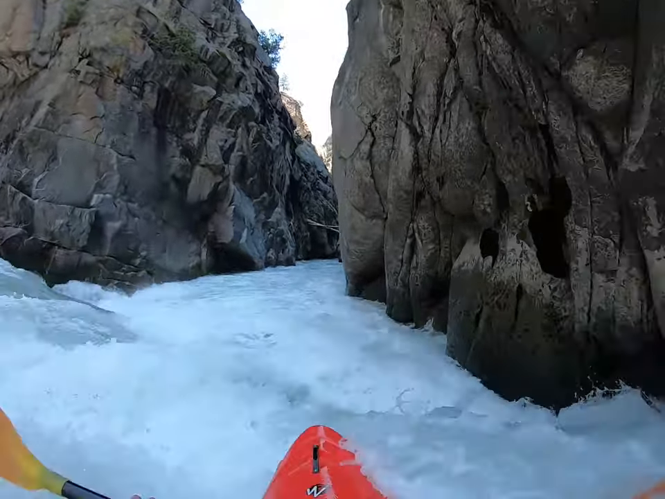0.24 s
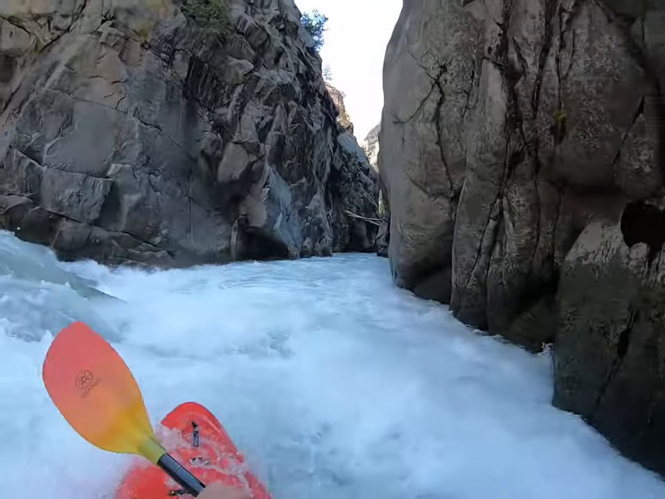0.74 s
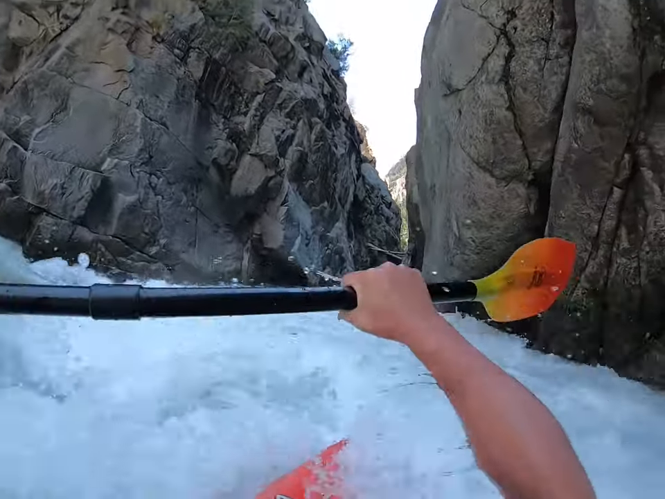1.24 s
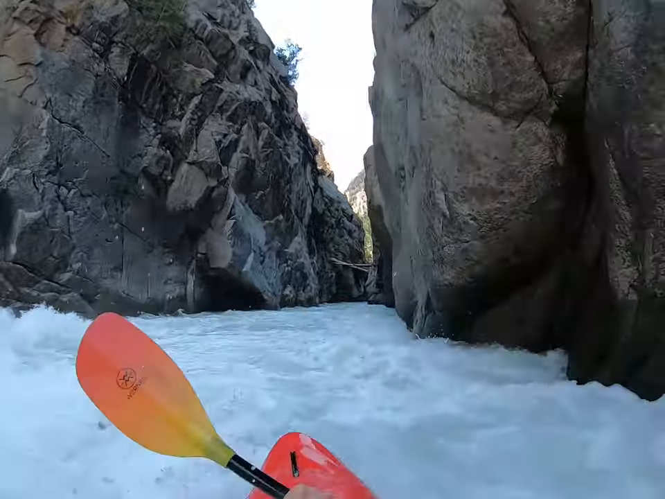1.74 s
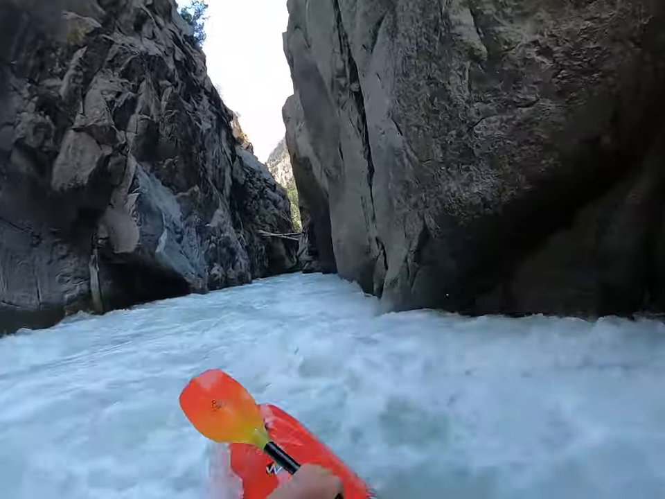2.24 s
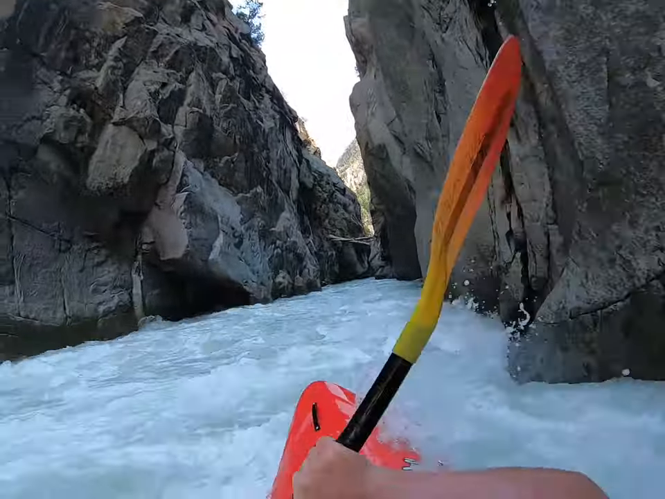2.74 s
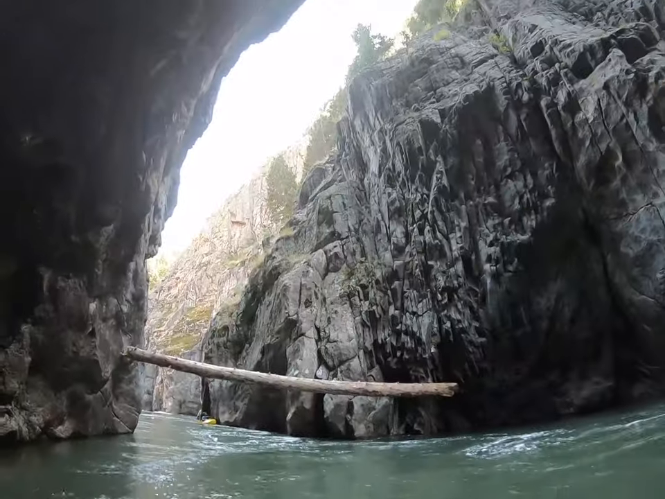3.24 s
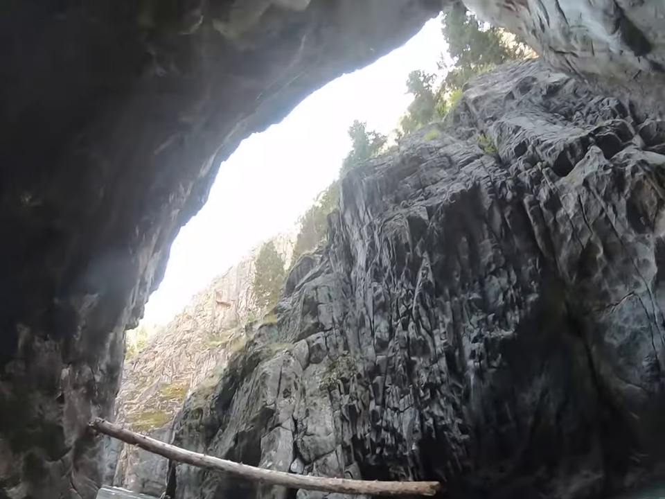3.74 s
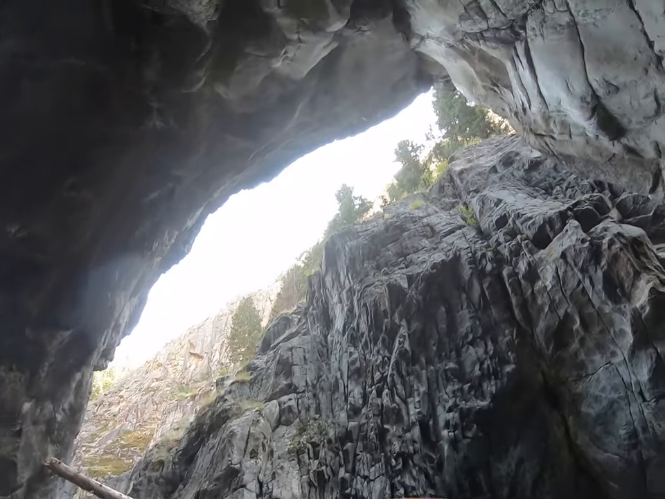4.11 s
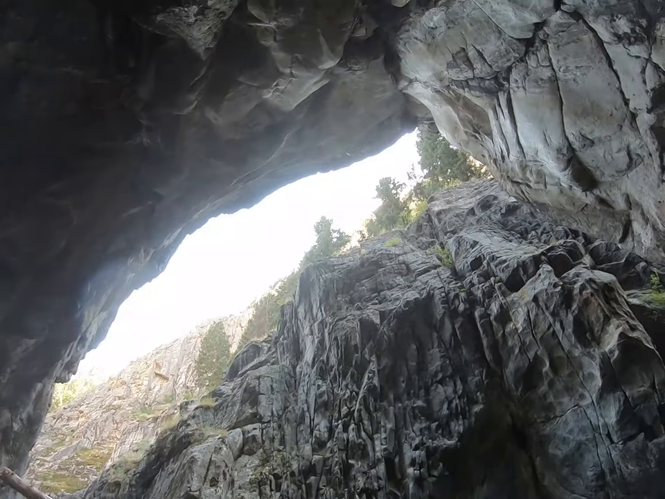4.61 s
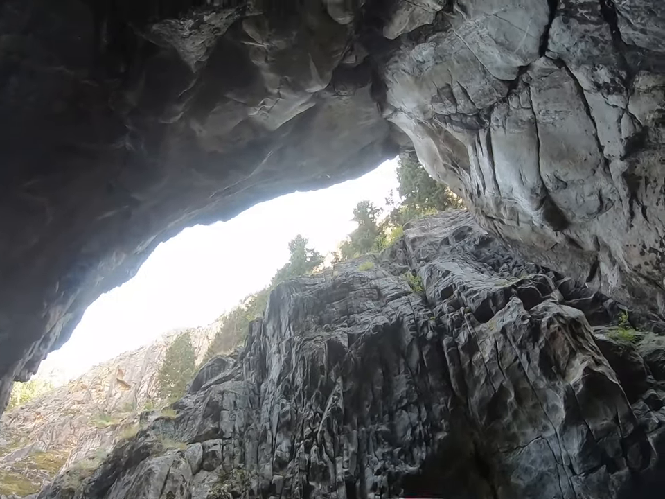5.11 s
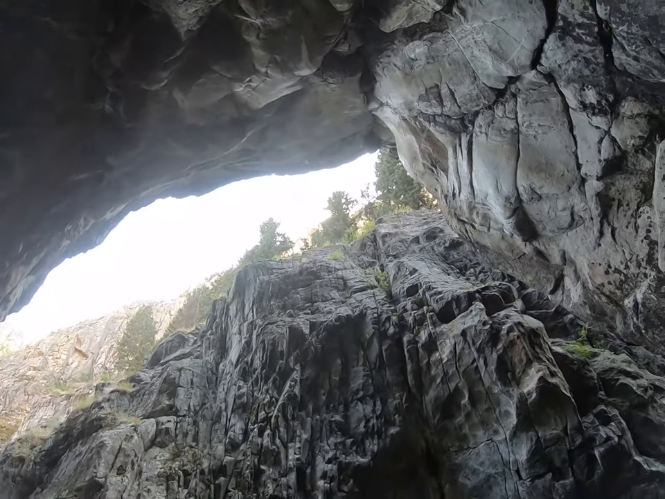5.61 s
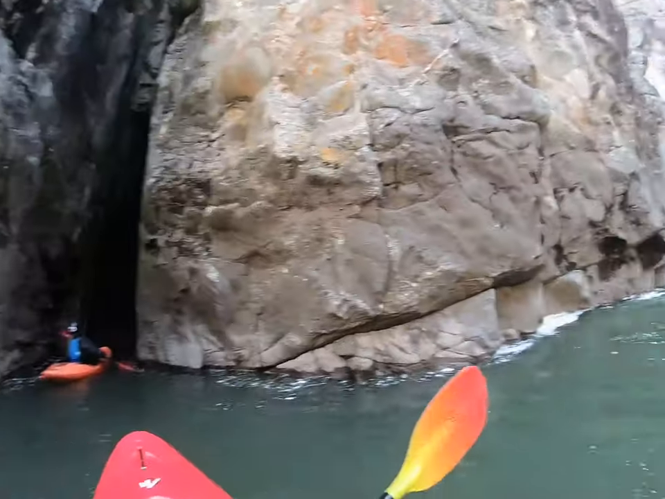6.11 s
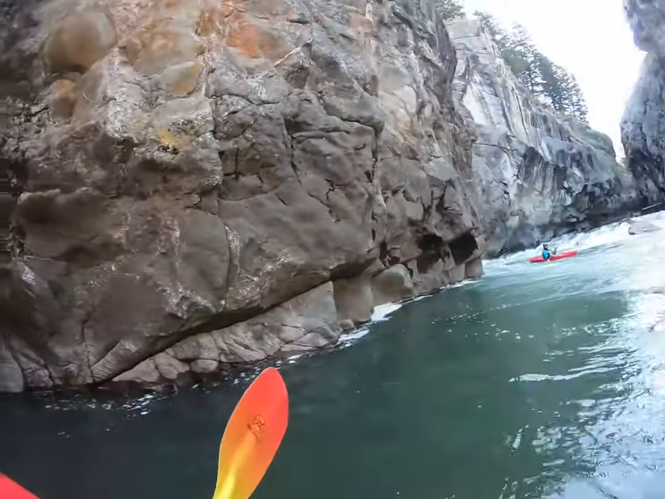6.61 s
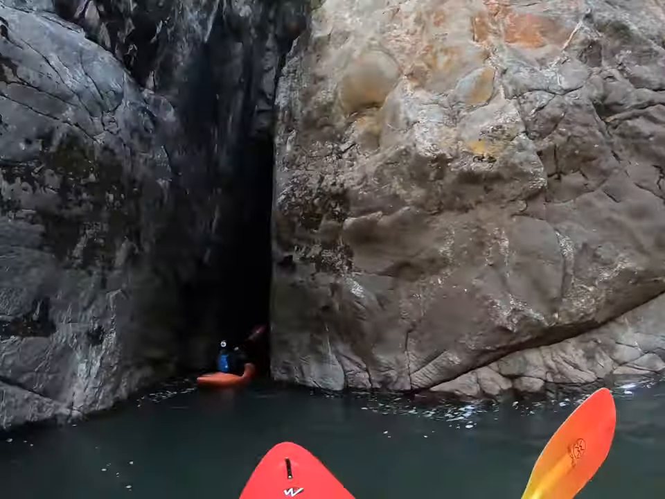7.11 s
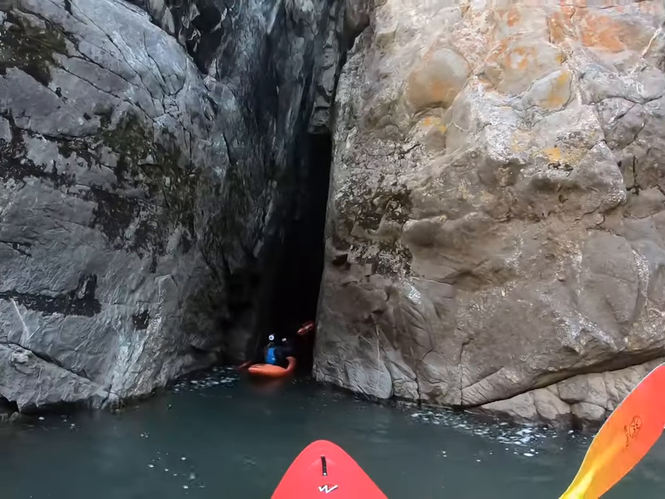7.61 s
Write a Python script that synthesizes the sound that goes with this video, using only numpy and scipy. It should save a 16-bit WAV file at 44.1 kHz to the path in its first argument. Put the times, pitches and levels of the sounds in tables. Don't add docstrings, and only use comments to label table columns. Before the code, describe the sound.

Powerful rapids pound around the boat, boomy and uneven, dipping briefly before swelling again. Suddenly the scene becomes a calm rocky eddy: soft low water murmur, slow laps, a few tiny ticks on the camera housing, the last with a short watery plink. Then a smooth, open rush of rapids fills a pool, quiet compared with the start, softening and returning as the head turns.

```python
import sys
import numpy as np
from scipy import signal
from scipy.fft import rfft, irfft, next_fast_len
from scipy.io import wavfile

SR = 44100
rng = np.random.default_rng(int(sys.argv[2]) if len(sys.argv) > 2 else 0)


def generate_wav(signal):
    frames = np.transpose(np.atleast_2d(signal))
    scaled = np.clip(frames, -1, 1) * 32767
    pcm = np.round(scaled).astype(np.int16)
    wavfile.write(sys.argv[1], SR, pcm)


def makeup_ratio(level_db):
    decades = np.asarray(level_db, float) / 20
    return 10 ** decades


N = 346343

CUTS_S = 2.8792, 5.7818
RAPID_HZ, SPRAY_HZ = (20, 130, 330, 1300, 10700), (10500, 15750)
EDDY_HZ, POOL_HZ = (20, 130, 1300, 4800, 15000), (20, 130, 1300, 6500, 15500)
# frequency in Hz, level in dB per Hz.
RAPID_COLOUR = [(20, -7), (60, 0.5), (250, 3), (540, -4.5), (660, -8), (1200, -17.5), (1430, -22.5),
                (1700, -22.5), (2180, -36), (2630, -34.5), (3600, -52), (6300, -57.5), (7000, -64),
                (10500, -71.5)]
EDDY_COLOUR = [(20, -3), (40, -4), (110, -9.5), (150, -2.5), (230, -4), (400, -9), (900, -15), (1500, -19),
               (3000, -26.5), (4500, -36.5), (6000, -44), (8000, -59.5), (11500, -64), (13000, -74)]
POOL_COLOUR = [(25, -22), (65, -4.5), (110, -7), (150, -2), (210, 0), (400, -5), (1000, -9.5), (2000, -18),
               (3500, -25.5), (6000, -36.5), (7500, -49.5), (9500, -51.5), (12000, -52), (14000, -64)]
SPRAY_COLOUR = [(10500, -45.5), (11000, -25), (11500, -8.5), (12200, -0.5), (13000, -7), (14000, -9),
                (15500, -17)]
# frequency in Hz, likeness from 0 to 1, left lead in radians,
# left minus right in dB.
EDDY_PORTS = [(30, .2, -.5, -5), (95, .5, 0, -1.5), (125, .95, 0, -.5), (350, .95, 0, -.5),
              (700, .6, -.1, -2), (1000, .26, .6, -2.3), (1400, .23, .4, -.6), (2000, .38, -.3, .5),
              (3500, .64, .1, 0), (5500, .3, .3, -.4), (7500, .16, 2.1, 0), (10000, .16, 3.4, -2.6)]
POOL_PORTS = [(30, .6, 2.1, -8), (95, .55, 0, -2.5), (130, .97, -.1, 0), (230, .98, -.1, 0),
              (400, .87, -.3, -1.6), (700, .48, -.4, -4.9), (1000, .32, 1.3, -5.4), (1400, .35, 1.3, -2.6),
              (2000, .34, .6, -1.7), (3500, .48, .2, -2.9), (5500, .32, -2, -4.2), (7500, .36, -2.9, -1.2),
              (10000, .38, -3.6, -6.5)]
ONE_PORT = [(20, 1, 0, 0), (20000, 1, 0, 0)]
# start in seconds, peak in dB, left minus right in dB.
DROPS = [
    (4.5544, -74, 1.0),
    (4.9711, -59, 0.0),
    (5.3844, -76, -0.5),
    (5.6396, -51, -3.0),
]
# T60 in seconds, low edge in Hz, high edge in Hz.
DROP_TIMBRES = [
    (.03, 9500, 12000),
    (.04, 3500, 13500),
    (.03, 10000, 12000),
    (.07, 2200, 6000),
]
# time in seconds, dB from its usual force.
RAPID_FORCE = [(0.03, 0.35), (1.1, 0.4), (1.5, 1.5), (1.64, 0), (1.74, -7), (2.05, -5), (2.25, -2),
               (2.58, -1.5), (2.87, -3.5)]
EDDY_FORCE = [(2.9, 4.5), (3.4, 4), (3.8, 1), (4.1, 0.1), (5.0, 0.3), (5.77, -0.3)]
POOL_FORCE = [(5.8, 1.2), (6.1, 0.8), (6.3, -1), (6.95, -1.1), (7.25, 0.28), (7.85, 0.68)]
# time in seconds, level in dB.
SPRAY_FORCE = [(0.03, -61.5), (0.46, -63.5), (1.33, -59.5), (1.54, -59.5), (1.69, -64), (1.79, -76.5),
               (2.28, -64), (2.51, -63), (2.87, -67)]
# level in dB at usual force, share of the force's swing.
RAPID_LAYERS = [
    (-28.5, 0.74),
    (-24, 1.05),
    (-23.5, 0.86),
    (-41, 0.067),
]
EDDY_LAYERS = [
    (-49.5, 0.88),
    (-44, 0.78),
    (-56.5, 0.85),
    (-74.5, 0.18),
]
POOL_LAYERS = [
    (-56.5, 0.21),
    (-40.5, 0.086),
    (-50, 0.076),
    (-70.5, 1.4),
]
SPRAY_LAYERS = [(0, 1)]
# time in seconds, lift in dB,
# length in seconds, pitch in Hz.
RAPID_WAVES = [(0.053, 9.5, 0.03, 190), (0.23, 6, 0.24, 110), (0.45, 6.5, 0.082, 149), (0.6, 6, .04, 202),
               (0.792, 8.5, 0.089, 182), (0.87, -14, .05, 54.6), (0.9, 2.5, 0.2, 2500),
               (1.055, 7, 0.074, 250), (1.181, 13, 0.015, 192), (1.22, -18, 0.031, 195),
               (1.26, -3.5, 0.033, 1500), (1.328, 2.5, 0.037, 510), (1.417, 6, .025, 55),
               (1.486, 8.5, 0.025, 260), (1.5, 4.5, 0.046, 3000), (1.511, 3, 0.12, 520),
               (1.602, 7, 0.078, 50), (1.63, 8.5, 0.067, 130), (1.743, -10, .04, 35), (1.95, 5, 0.36, 1000),
               (2.103, 9.5, 0.025, 300), (2.2, -6.5, 0.18, 140), (2.227, 8, 0.028, 282),
               (2.362, 4.5, 0.025, 270), (2.4, -21, 0.065, 40), (2.557, 8, 0.043, 205),
               (2.606, 13, 0.026, 59.3), (2.707, 2, .02, 100), (2.78, -8, 0.095, 302), (2.86, -3, .02, 60)]
EDDY_WAVES = [(2.95, 3, .05, 220), (3.2, 1.5, 0.26, 4000), (3.05, -13, .05, 45), (3.16, 10, 0.035, 85),
              (3.25, 9, 0.094, 89), (3.65, 4.5, 0.068, 170), (3.68, 13, .08, 32), (3.8, 17, 0.11, 71.6),
              (3.92, 8, 0.048, 30), (4.0, 8, 0.045, 129), (4.12, -7, .08, 60), (4.32, 10, .09, 32),
              (4.6, 10, .03, 40), (4.78, -11, .05, 110), (5.0, 5, .04, 30), (5.15, 3, .05, 70),
              (5.33, 4, .04, 140), (5.45, 4, .05, 40), (5.65, -17, 0.099, 50)]
POOL_WAVES = [(5.82, 5, .04, 90), (5.95, -8, .08, 45), (6.1, 13, 0.034, 130), (6.27, 22, 0.061, 60),
              (6.27, 6, 0.04, 170), (6.36, 15, 0.027, 75), (6.5, 16, 0.045, 40), (6.53, 7, 0.082, 130),
              (6.75, 7, 0.029, 211), (6.88, -6, .1, 45), (6.95, 2.5, 0.092, 200), (7.08, 8, 0.088, 70),
              (7.3, -5, .07, 40), (7.45, 14, 0.044, 90), (7.45, 5.5, 0.036, 151), (7.6, -11, .06, 50),
              (7.84, 4, .03, 150)]

WAVE_OCTAVES = 0.51
LUMPY_HZ = 45
HEAVE_TOP_HZ = 2500
TOP_HZ = 15750
PORT_CUT_HZ, WIND_TOP_HZ = 5.3, 110
OPENS_S, WATER_OPENING_S, WIND_OPENING_S = 3.43, 1, .35
WATER_WIDTH_DB, WIND_WIDTH_DB = 1.9, -1.5
GATE_EASES_S = 3.88
PLINK_S, PLINK_DB, PLINK_HZ, PLINK_T60_S = 5.6415, -46, 2700, .015
DROP_TOP_HZ = 13800
EDDY_FADE_S, POOL_FADE_S = .0015, .004
FIRST_SWING, LAST_SWING = -.28, .03


def in_time(rows, start, size):
    s, *columns = np.transpose(rows)
    t = (start + np.arange(size)) / SR
    return np.array([np.interp(t, s, c) for c in columns])


def at_hz(rows, hz):
    table_hz, *columns = np.transpose(rows)
    return [np.interp(np.log(hz + 1), np.log(table_hz), c) for c in columns]


def drift(rate, size):
    r = np.exp(-128 * np.pi * rate / SR)
    noise = rng.standard_normal(size // 64 + 1002)
    slow = signal.lfilter([1], [1, -2 * r, r * r], noise)[1000:]
    return np.interp(np.arange(size) / 64, np.arange(len(slow)), slow / slow.std())


def drops():
    out, t = np.zeros((2, N)), np.arange(SR // 20) / SR
    for (s, db, pan_db), (t60, low_hz, high_hz) in zip(DROPS, DROP_TIMBRES):
        bright = signal.butter(2, [low_hz, high_hz], "band", fs=SR, output="sos")
        swell = (1 - np.exp(-t / 0.00074)) * makeup_ratio(-60 * t / max(t60, 1e-3))
        tick = signal.sosfilt(bright, rng.standard_normal((2, len(t))) * swell)
        at = round(s * SR)
        out[:, at:at + len(t)] += tick * makeup_ratio(db + np.array([[pan_db], [-pan_db]]) / 2)
    return out


def plink():
    out, t = np.zeros(N), np.arange(SR // 20) / SR
    at = round(PLINK_S * SR)
    swell = makeup_ratio(PLINK_DB - 60 * t / PLINK_T60_S) * (1 - np.exp(-t / 0.00053))
    out[at:at + len(t)] = swell * np.sin(2 * np.pi * PLINK_HZ * t)
    return out


def collapses(per_s, spread_db, size):
    born = rng.random((2, size)) < per_s / SR
    loudness = makeup_ratio(spread_db * rng.exponential(1, (2, size)))
    clicks = born * loudness * rng.choice([-1, 1], (2, size))
    return clicks / clicks.std()


def waves_db(waves, centre_hz, t):
    lift = np.zeros(len(t))
    for s, db, length, hz in waves:
        octaves = np.log2(centre_hz / hz) / WAVE_OCTAVES
        lift += db * np.exp(-octaves ** 2 - ((t - s) / max(length, .005)) ** 2)
    return lift


def at_ports(bubbles, hz, top_hz, colour, ports):
    tone = makeup_ratio(at_hz(colour, hz)[0]) * (hz < top_hz)
    common, other = rfft(bubbles) * tone * hz ** 2 / (hz ** 2 + PORT_CUT_HZ ** 2)
    alike, lead, pan_db = at_hz(ports, hz)
    alike = np.clip(alike, 0, 1)
    left = common * makeup_ratio(pan_db / 2)
    right = alike * np.exp(-1j * lead) * common + np.sqrt(1 - alike ** 2) * other
    return left, right * makeup_ratio(-pan_db / 2)


def water(start, stop, force, layers, waves, edges, colour, ports, per_s, spread_db, heave_db, churn_db):
    size = next_fast_len(stop - start)
    hz = np.fft.rfftfreq(size, 1 / SR)
    left, right = at_ports(collapses(per_s, spread_db, size), hz, edges[-1], colour, ports)

    power = np.abs((left + right) / 2) ** 2 * 2 / size ** 2
    layer_rms = [np.sqrt(power[(hz >= a) & (hz < b)].sum()) for a, b in zip(edges, edges[1:])]
    level_db, follows = np.transpose(layers)[:, :, None]
    gains = makeup_ratio(level_db + follows * in_time(force, start, size)) / np.array(layer_rms)[:, None]

    t = (start + np.arange(size)) / SR
    coarse = t[::64]
    centres = edges[0] * 2 ** np.arange(0, np.log2(TOP_HZ / edges[0]) + .5, .5)
    out, heave = 0, drift(12.0, size)
    for k, centre in enumerate(centres):
        share = np.interp(np.log(hz + 1), np.log(centres), np.arange(len(centres)) == k)
        gain = gains[min(np.searchsorted(edges[1:], centre), len(gains) - 1)]
        motion_db = np.interp(t, coarse, waves_db(waves, centre, coarse))
        motion_db += heave_db * heave / (1 + centre / HEAVE_TOP_HZ)
        motion_db += churn_db * (1 + (LUMPY_HZ / centre) ** 2) * drift(11.6, size)
        out = out + irfft(share * np.array([left, right]), size) * gain * makeup_ratio(motion_db)
    return out[:, :stop - start]


def wind_guard(x, start):
    mid, side = (x[0] + x[1]) / 2, (x[0] - x[1]) / 2
    wind = signal.sosfiltfilt(signal.butter(2, WIND_TOP_HZ, fs=SR, output="sos"), side)
    since = np.maximum(np.arange(start, start + x.shape[1]) / SR - OPENS_S, 0)
    water_width = makeup_ratio(WATER_WIDTH_DB) * (1 - np.exp(-since / WATER_OPENING_S))
    wind_width = makeup_ratio(WIND_WIDTH_DB) * (1 - np.exp(-since / WIND_OPENING_S))
    side = water_width * (side - wind) + wind_width * wind
    return np.array([mid + side, mid - side])


def treble_gate(x, line_db, band_db, rise_db):
    hz, _, cells = signal.stft(x, SR, "cosine", 2048, 1024)
    size = np.abs(cells)
    bands = np.sqrt((size[:, :1024] ** 2).reshape(2, 64, 16, -1).mean(axis=2))
    climb = rise_db * np.clip(hz[8:1024:16] / 1000 - 11.9, 0, None)[:, None]
    heard = bands > makeup_ratio(band_db + climb + rng.normal(0, 1.5, bands.shape))
    cells[:, :1024] *= np.repeat(heard, 16, axis=1)
    cells = cells * (size > makeup_ratio(line_db))
    return signal.istft(cells, SR, "cosine", 2048, 1024)[1][:, :x.shape[1]]


def pinned(x, start, end):
    settle = np.exp(-(np.arange(x.shape[1]) / SR / .002) ** 2)
    return x + (start - x[:, :1]) * settle + (end - x[:, -1:]) * settle[::-1]


def fade_in(size, fade_s):
    return 1 - np.exp(-(np.arange(size) / SR / fade_s) ** 2)


def distant_pool(start, stop):
    pool = water(start, stop, POOL_FORCE, POOL_LAYERS, POOL_WAVES, POOL_HZ, POOL_COLOUR, POOL_PORTS,
                 per_s=25000, spread_db=1.88, heave_db=0.08, churn_db=0.14)
    pool = treble_gate(pool, line_db=-124, band_db=-123, rise_db=9)
    return pool * fade_in(stop - start, POOL_FADE_S)


def calm_eddy(start, stop):
    eddy = water(start, stop, EDDY_FORCE, EDDY_LAYERS, EDDY_WAVES, EDDY_HZ, EDDY_COLOUR, EDDY_PORTS,
                 per_s=25000, spread_db=2.0, heave_db=-0.9, churn_db=0.87)
    eddy = wind_guard(eddy, start)
    hard = treble_gate(eddy, line_db=-118.5, band_db=-117, rise_db=20)
    soft = treble_gate(eddy, line_db=-128, band_db=-124.5, rise_db=30)
    eddy = np.where(np.arange(start, stop) < GATE_EASES_S * SR, hard, soft)
    dull = signal.butter(8, DROP_TOP_HZ, fs=SR, output="sos")
    eddy = eddy + signal.sosfilt(dull, drops() + plink())[:, start:stop]
    eddy = eddy * fade_in(stop - start, EDDY_FADE_S)[::-1]
    return pinned(eddy, 0, 0)


def whitewater(start, stop):
    rapid = water(start, stop, RAPID_FORCE, RAPID_LAYERS, RAPID_WAVES, RAPID_HZ, RAPID_COLOUR, ONE_PORT,
                  per_s=22000, spread_db=1.5, heave_db=0.6, churn_db=1.37)
    spray = water(start, stop, SPRAY_FORCE, SPRAY_LAYERS, [], SPRAY_HZ, SPRAY_COLOUR, ONE_PORT,
                  per_s=22000, spread_db=1.5, heave_db=0.5, churn_db=1.2)
    rapid[1] += 2 * spray[1]
    rapid = treble_gate(rapid, line_db=-103, band_db=-112, rise_db=2)
    return pinned(rapid, FIRST_SWING, LAST_SWING)


def scene():
    first, second = (round(s * SR) for s in CUTS_S)
    return np.hstack([whitewater(0, first), calm_eddy(first, second), distant_pool(second, N)])


def band_limit(x):
    return signal.sosfilt(signal.butter(12, 15750, fs=SR, output="sos"), x)


def record(dry):
    return band_limit(dry)


dry = scene()
out = record(dry)
generate_wav(out)
```